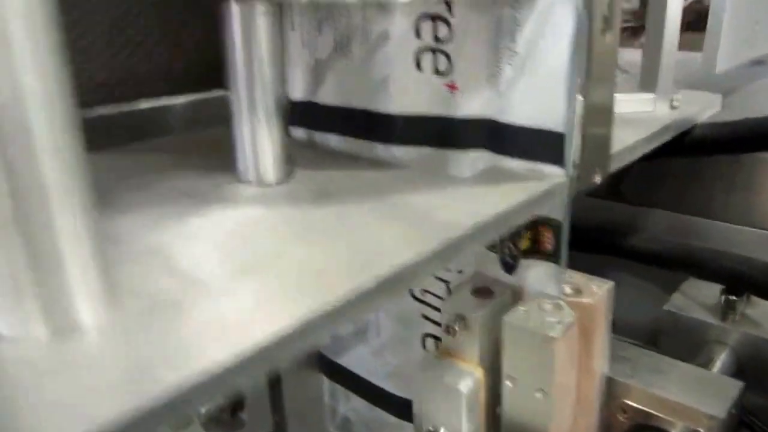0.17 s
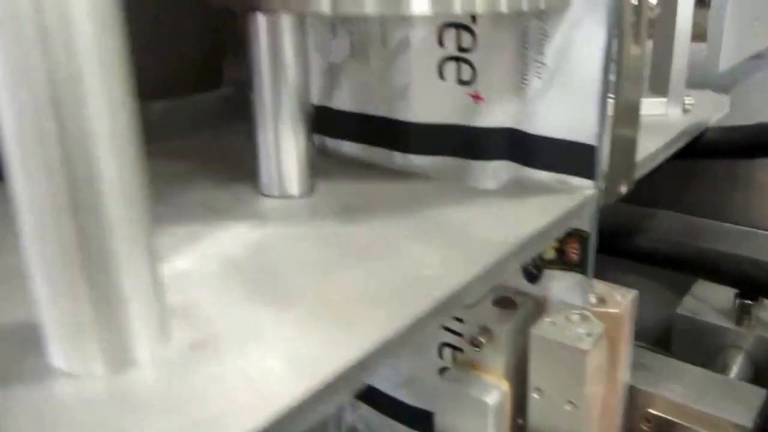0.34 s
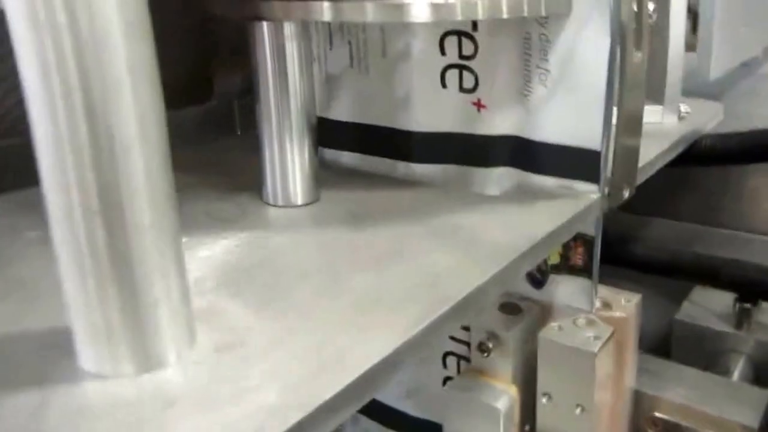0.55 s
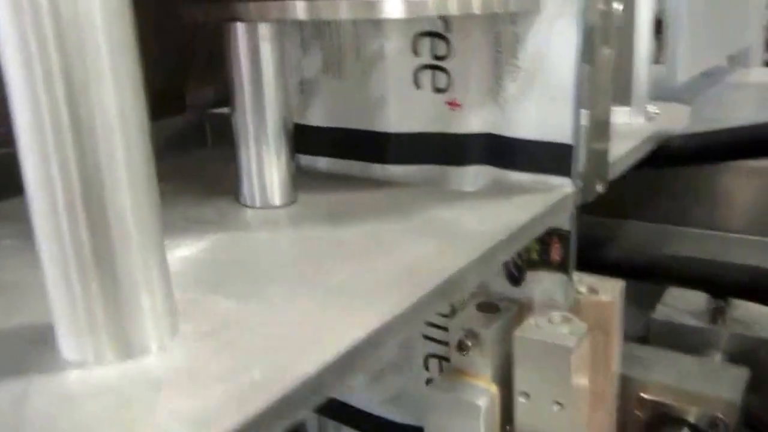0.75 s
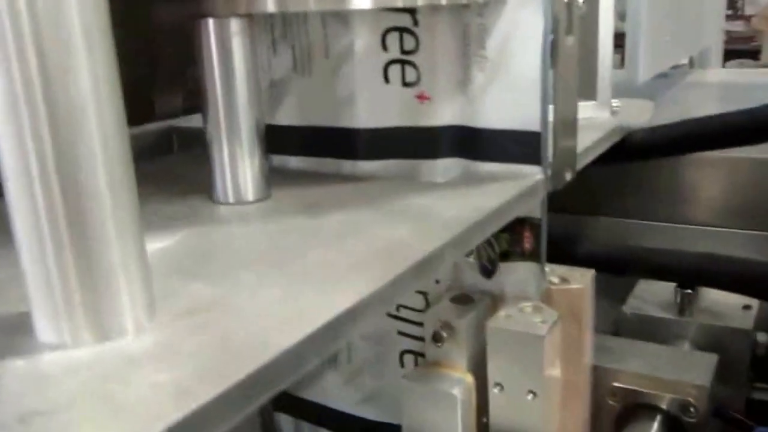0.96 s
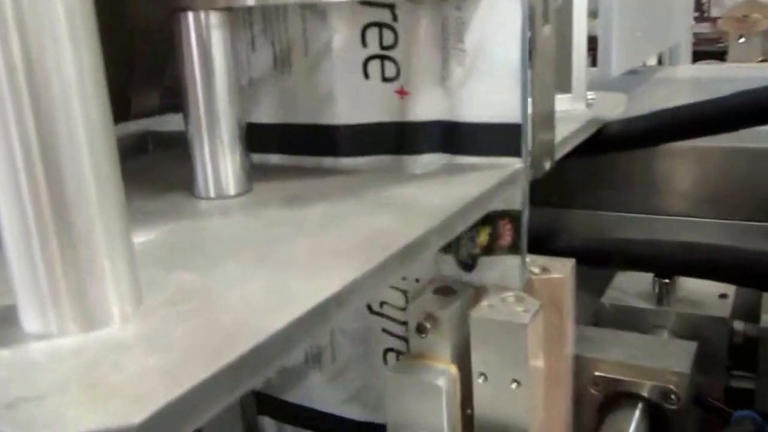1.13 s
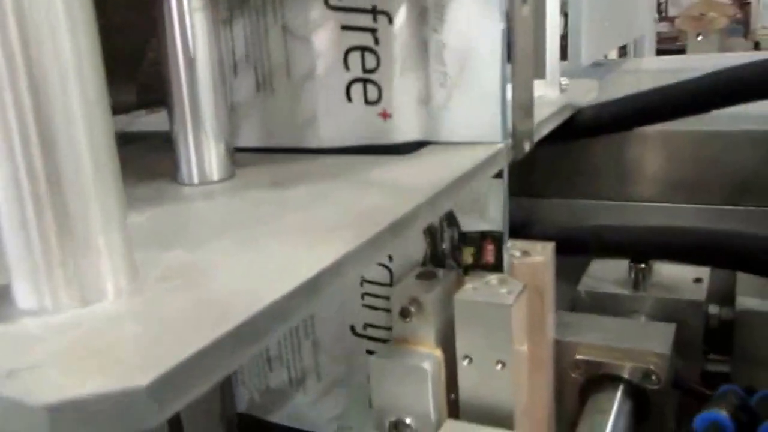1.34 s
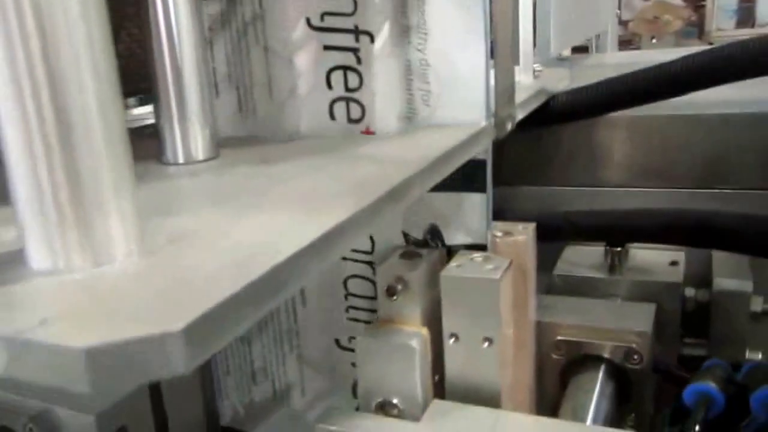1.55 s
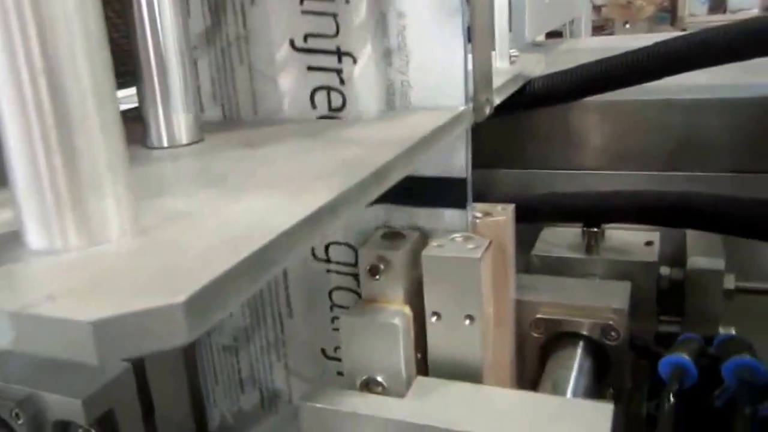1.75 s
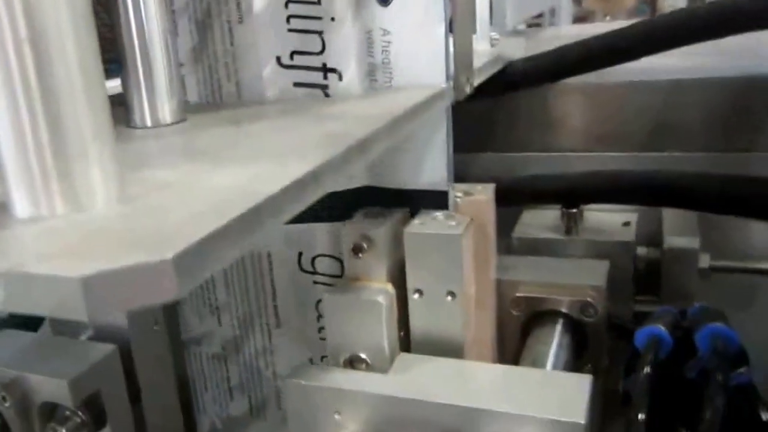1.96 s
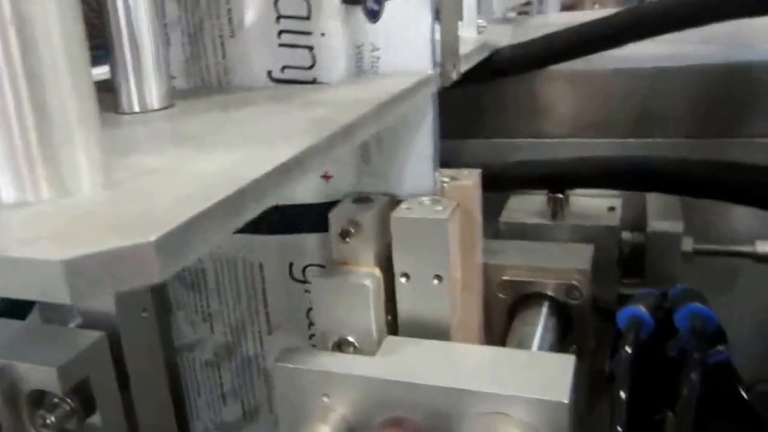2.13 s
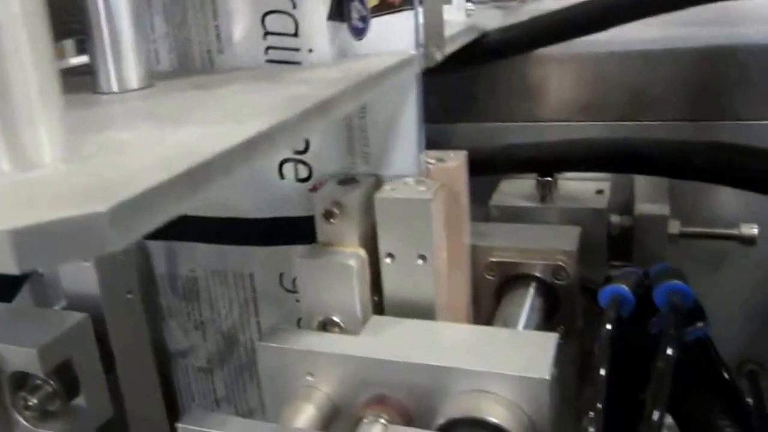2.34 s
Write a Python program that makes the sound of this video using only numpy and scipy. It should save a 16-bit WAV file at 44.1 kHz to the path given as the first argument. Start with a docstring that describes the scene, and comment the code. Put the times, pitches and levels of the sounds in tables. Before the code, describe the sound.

A packaging machine clacks, thuds and hisses through one cycle, then film ticks over rollers

```python
"""A bag-packing machine runs through one cycle in a factory hall, heard from close by.
Its steel jaws clack, knock and thud: each blow is a set of fading tones with a short noisy crack.
Coloured noise makes the hissing air valves, the moving carriage and the sliding film.
A thin snap, squeaks and ringing plates join in; light ticks and dull bumps follow as film is drawn.
A low, wavering motor hum, made of sine tones, lies under it all."""
import sys
import numpy as np
from scipy import signal
from scipy.fft import rfft, irfft
from scipy.io import wavfile

SR = 44100
rng = np.random.default_rng(int(sys.argv[2]) if len(sys.argv) > 2 else 0)


def unload_wav(signal):
    """Save mono or channel-first audio to the path in sys.argv[1] as 16-bit WAV at rate SR, clipped to [-1, 1]."""
    wavfile.write(
        sys.argv[1],
        SR,
        np.round(np.clip(np.atleast_2d(signal).T, -1, 1) * 32767).astype(np.int16),
    )


N = 105840
TIME = np.arange(N) / SR

# tones of a struck film roller: (frequency [Hz], level [dB], time to fade by 60 dB [s])
ROLLER = [(710, -13, 0.029), (892, -4, .04), (1140, 3, 0.035), (1420, -22, 0.023), (1570, -3.5, 0.029),
          (1720, -9, 0.026), (2328, -3, 0.022), (4410, -9.5, 0.019), (4790, -12.5, 0.021),
          (5360, -15, 0.016)]


def amp(db):
    """Turns decibels into a gain."""
    return 10 ** (np.asarray(db) / 20)


def balance(left_db, right_db):
    """Gives one gain to each of the two channels."""
    return amp([[left_db], [right_db]])


def unit(x):
    """Scales a sound to an average (rms) strength of 1."""
    return x / np.sqrt(np.mean(x ** 2) + 1e-20)


def read(points, hz):
    """Reads a table between its points, with frequency on a log scale."""
    f, value = np.transpose(points)
    return np.interp(np.log(hz + 1), np.log(f), value)


def add(mix, start_s, sound):
    """Mixes a sound in at its start time, cutting off what runs past the end."""
    part = mix[:, round(start_s * SR):][:, :sound.shape[-1]]
    part += sound[..., :part.shape[1]]


def tilt(hz, bright_db):
    """Gain that rises or falls by so many dB per octave."""
    return amp(bright_db * np.log2(np.maximum(hz, 20)))


def noise(tone, size, bright_db=0):
    """Noise coloured by the machine's panels: alike in both channels in the middle, unrelated in the treble."""
    # how alike left and right are: (frequency [Hz], likeness [0 to 1])
    likeness = [(30, 0.54), (70, 0.64), (140, .99), (500, 1), (1100, 0.91), (2200, 0.26), (4500, 0.16),
                (9000, 0.062)]
    # resonances of the machine's panels: (frequency [Hz], width [Hz], boost [dB])
    resonances = [(117.5, 7.4, 1), (239, 13, 2.5), (324, 18, 4), (526.6, 23, 5), (594, 8.1, 4.5),
                  (675, 10, 5.5), (795, 23, 4), (941, 24, 5.5), (994, 51, -6.5), (1165, 130, 3),
                  (1490, 70, 2), (1740, 27, 2), (2334, 78, 3), (2740, 47, -2), (3635, 60, 4.5)]
    hz = np.fft.rfftfreq(size, 1 / SR)
    left, other = rfft(rng.standard_normal((2, size)))
    shared = np.clip(read(likeness, hz), -1, 1)
    right = shared * left + np.sqrt(1 - shared ** 2) * other
    panels_db = sum(db / (1 + (2 * (hz - centre) / width) ** 2) for centre, width, db in resonances)
    gain = amp(read(tone, hz) + panels_db) * tilt(hz, bright_db)
    return unit(irfft(np.array([left, right]) * gain, size))


def wander(rate_hz):
    """Slow random motion of rms 1; a higher rate moves faster."""
    hz = np.fft.rfftfreq(N, 1 / SR)
    smoothing = np.exp(-(hz / rate_hz) ** 2) * (hz > 0)
    return unit(irfft(rfft(rng.standard_normal(N)) * smoothing, N))


def fade(t, t60):
    """Dies away smoothly, losing 60 dB in t60 seconds."""
    return np.exp(-np.log(1000) * t / t60)


def blows(events, modes, tone, rise_s, crack_db, crack_t60, tail_db, tail_t60):
    """Each blow makes a part ring at its own tones, with a short noisy crack and a longer noisy tail."""
    ring_s = .5
    out = np.zeros((2, N))
    t = np.arange(0, ring_s, 1 / SR)
    for start_s, db, bright_db in events:
        ring = sum(amp(mode_db) * tilt(hz, bright_db) * fade(t, t60) * np.sin(2 * np.pi * hz * t)
                   for hz, mode_db, t60 in modes)
        crack = unit(noise(tone, len(t), bright_db) * fade(t, crack_t60))
        tail = unit(noise(tone, len(t), bright_db) * fade(t, tail_t60))
        blow = unit(ring) + amp(crack_db) * crack + amp(tail_db) * tail
        blow = blow * (1 - np.exp(-t / rise_s))
        # the level sets the energy of the blow as if packed into 10 ms
        add(out, start_s, amp(db) * unit(blow) * np.sqrt(.01 / ring_s))
    return out


def sliding(curve, tone, rough_db, rough_hz):
    """Uneven friction: coloured noise that follows a level curve and wavers at random."""
    level_db = np.interp(TIME, *np.transpose(curve))
    return noise(tone, N) * amp(level_db + rough_db * wander(rough_hz))


def motor_hum():
    """Motor hum: a few low tones, each wavering in pitch and strength."""
    # tones of the hum: (frequency [Hz], level [dB])
    tones = [(108, -45), (167, -42), (246, -50), (527, -54), (587, -51.5)]
    waver_hz = 3.52
    hum = 0
    for hz, db in tones:
        phase = 2 * np.pi * np.cumsum(hz + waver_hz * wander(11.4)) / SR
        hum = hum + amp(db) * unit(np.sin(phase)) * amp(1.1 * wander(6.2))
    return hum


def factory_noise():
    """Dull noise of the factory hall that drifts gently in level."""
    # colour of the hall noise: (frequency [Hz], level [dB])
    colour = [(25, -13), (60, -11.5), (110, -9.5), (170, 1.5), (250, -1.5), (350, -11), (520, -7),
              (800, -16), (1500, -21), (2500, -33.5), (4000, -44), (9000, -62)]
    return amp(-37) * noise(colour, N) * amp(1.1 * wander(19))


def jaw_carriage():
    """The moving jaw carriage rumbles as uneven friction noise."""
    # loudness of the carriage: (time [s], level [dB])
    loudness = [(0, -36), (.19, -40.5), (.25, -30), (.31, -26.5), (.37, -25), (.43, -23.5), (.5, -32.5),
                (.55, -36), (.62, -32), (.69, -34.5), (.8, -24.5), (.88, -36), (.97, -41.5), (1.2, -40.5),
                (1.28, -24), (1.36, -33.5), (1.46, -45), (2.4, -59)]
    # colour of the carriage noise: (frequency [Hz], level [dB])
    colour = [(40, -2), (120, -5), (220, 0), (450, 0), (750, -3), (1000, -8.5), (1300, -11), (2300, -21),
              (3500, -36), (7000, -45.5), (15000, -37.5)]
    return sliding(loudness, colour, rough_db=1.7, rough_hz=70)


def drive_train():
    """The drive train adds a deep, slowly wavering rumble."""
    # loudness of the rumble: (time [s], level [dB])
    loudness = [(0, -40.5), (.18, -44), (.21, -27), (.235, -41), (.258, -18.5), (.29, -47), (.6, -39),
                (.68, -27.5), (.74, -34), (.9, -47.5), (1.8, -44), (2.4, -43.5)]
    # colour of the rumble: (frequency [Hz], level [dB])
    colour = [(20, -17), (40, 0), (62, -4), (100, -2), (140, -9.5), (300, -28), (1000, -70)]
    return sliding(loudness, colour, rough_db=-2.5, rough_hz=12)


def film_drive():
    """The film drive grows louder as it runs up, as low, uneven noise."""
    # loudness of the drive: (time [s], level [dB])
    loudness = [(0, -57), (1.2, -57), (1.45, -38.5), (1.8, -37), (2.05, -35), (2.25, -31.5), (2.4, -30)]
    # colour of the drive noise: (frequency [Hz], level [dB])
    colour = [(40, -6.5), (105, 6), (200, -2.5), (350, -3), (560, -1.5), (850, -4), (1000, -3.5),
              (1170, -9.5), (1600, -14.5), (3000, -30.5), (8000, -33)]
    return sliding(loudness, colour, rough_db=1.0, rough_hz=60)


def hiss():
    """Sliding film and leaking air hiss as bright, slightly uneven noise."""
    # loudness of the hiss: (time [s], level [dB])
    loudness = [(0, -59), (.18, -55), (.3, -53), (.5, -46.5), (.62, -57), (.7, -48), (.85, -57),
                (.93, -65.5), (1.19, -58), (1.23, -40), (1.36, -47), (1.8, -45.5), (2.4, -44.5)]
    # colour of the hiss: (frequency [Hz], level [dB])
    colour = [(800, 1), (2000, 4), (3000, 0), (4500, 3.5), (6000, -0.5), (9000, -4.5), (12000, -2),
              (15000, -7)]
    return sliding(loudness, colour, rough_db=0.45, rough_hz=150)


def air_valves():
    """Each air valve opens quickly, sags as the pressure falls, and shuts."""
    # puffs of air: (start [s], length [s], level [dB], sag [dB per s])
    vents = [(0.186, 0.015, -41.5, 10), (0.203, 0.11, -31, 136), (0.706, 0.06, -35, 15),
             (0.773, 0.059, -38, 137), (1.25, 0.013, -34, 10)]
    # colour of the escaping air: (frequency [Hz], level [dB])
    colour = [(300, -2), (1200, 5), (2500, 0), (4500, 0), (6500, -3), (10000, -3), (12500, 2), (14500, 3),
              (16000, -7)]
    rise_s, release_s = 0.0044, 0.011
    power = 0
    for start_s, length_s, db, sag_db in vents:
        t = np.maximum(TIME - start_s, 0)
        opening = np.minimum(t / rise_s, 1)
        closing = np.exp(-np.maximum(t - length_s, 0) / release_s)
        power = power + (amp(db - sag_db * t) * opening * closing) ** 2
    air = np.sqrt(power) * noise(colour, N) * amp(1.3 * wander(120))
    return air * balance(0.6, 0)


def frame_knocks():
    """The jaws knock and shake the frame, which rings low and fairly long."""
    # knocks: (time [s], level [dB], brightness [dB per octave])
    knocks = [(.1895, -25, -1), (.203, -23, 1.5), (.2445, -18, 0.5), (.277, -12.5, -0.5),
              (.292, -14.5, -0.5), (.4375, -11, -0.5), (.447, -12, -0.5), (.4615, -19, 0.5),
              (.470, -17, 0.5), (.499, -15.5, 0.5), (.520, -22, 2.5), (.546, -24, 0.5), (.568, -19, -2),
              (.7095, -21, -2), (.781, -28.5, 1), (.797, -21.5, 1.5), (.817, -23, 5), (.843, -25, 2),
              (1.259, -17.5, 2), (1.277, -22.5, -1), (1.292, -32, 7)]
    # tones of the frame: (frequency [Hz], level [dB], time to fade by 60 dB [s])
    modes = [(215.5, -4.5, .14), (245, 0, 0.19), (333, -9, .08), (380, -1, 0.053), (449.4, -2.5, .08),
             (518.4, -5.5, 0.14), (678.7, -2.5, 0.12), (801, -9, 0.11), (880, -16, 0.051),
             (1089, -6.5, 0.08)]
    # colour of the knock noise: (frequency [Hz], level [dB])
    colour = [(60, -16), (200, 4), (700, -3), (1300, -12.5), (2400, -20.5), (4000, -34), (15000, -51.5)]
    return blows(knocks, modes, colour, rise_s=0.0015,
                 crack_db=-1.5, crack_t60=0.066, tail_db=-8.5, tail_t60=0.49)


def jaw_clacks():
    """The steel jaws clack: hard blows with a fast start and short metal tones."""
    # clacks: (time [s], level [dB], brightness [dB per octave])
    clacks = [(.2622, -27, -3.5), (.2720, -11, -1.5), (.7205, -36.5, 12), (1.2425, -29.5, 2),
              (1.2580, -25, 3.5), (1.264, -29, 3), (1.277, -23, -3), (1.284, -28, -0.5)]
    # tones of the jaws: (frequency [Hz], level [dB], time to fade by 60 dB [s])
    modes = [(1230, -5.5, 0.019), (1250, 2.5, 0.039), (1420, -5, 0.029), (1538, -9.5, 0.04),
             (1886, -17, 0.064), (2190, -14, 0.03), (2753, -12.5, 0.038), (3490, -12.5, 0.025),
             (4210, -18, 0.042), (5570, -9, 0.012)]
    # colour of the clack noise: (frequency [Hz], level [dB])
    colour = [(150, -19), (700, -5.5), (1300, 5), (2300, -7), (4000, -10), (6000, -15.5), (10000, -21),
              (15000, -26.5)]
    return blows(clacks, modes, colour, rise_s=0.00065,
                 crack_db=-2, crack_t60=0.024, tail_db=-11, tail_t60=0.16)


def jaw_thuds():
    """The jaws thud against their stops: deep blows with a soft start and little noise."""
    # thuds: (time [s], level [dB], brightness [dB per octave])
    thuds = [(.7635, -10.5, -6.5), (.7795, -11, -9), (.8185, -5, 0.5), (.8275, -17.5, -1.5)]
    # tones of the machine body: (frequency [Hz], level [dB], time to fade by 60 dB [s])
    modes = [(71, -21, 0.086), (126, -7, 0.079), (183.3, 4.5, 0.034), (208.2, 3.5, 0.058),
             (242.8, 1.5, 0.079), (334, -8, 0.034)]
    # colour of the thud noise: (frequency [Hz], level [dB])
    colour = [(40, -28), (120, 3.5), (300, -1), (600, -14), (1500, -35), (5000, -65)]
    return blows(thuds, modes, colour, rise_s=0.0064,
                 crack_db=-17, crack_t60=0.046, tail_db=-22, tail_t60=0.78)


def from_right(pair):
    """Sound from the right reaches the left microphone a moment later."""
    lag_s = .00006
    delay = np.exp(-2j * np.pi * np.fft.rfftfreq(N, 1 / SR) * lag_s)
    return np.array([irfft(rfft(pair[0]) * delay, N), pair[1]])


def guide_squeaks():
    """The jaw guides squeak as the jaws slide: a thin, unsteady tone swells and fades."""
    # squeaks: (start [s], length [s], level [dB])
    squeaks = [(0.78, 0.014, -36), (0.797, 0.082, -51), (1.266, 0.037, -39)]
    pitch_hz, waver_hz = 4260, 110
    level = sum(amp(db) * np.sin(np.pi * np.clip((TIME - start_s) / length_s, 0, 1))
                for start_s, length_s, db in squeaks)
    return level * np.sin(2 * np.pi * np.cumsum(pitch_hz + waver_hz * wander(200)) / SR)


def snap():
    """A dry, high snap to the right, perhaps the blade: short tones and a sharp crack."""
    # the snap: (time [s], level [dB], brightness [dB per octave])
    snaps = [(.9155, -28.5, -5.5)]
    # tones of the blade: (frequency [Hz], level [dB], time to fade by 60 dB [s])
    modes = [(4890, -4, 0.019), (5430, -4, .008), (6470, -1.5, 0.016), (11230, 2, .011),
             (12030, -1.5, 0.019)]
    # colour of the snap noise: (frequency [Hz], level [dB])
    colour = [(1000, -23), (3500, -11), (5500, -1), (8000, 1), (12000, -10), (15000, -3)]
    sound = blows(snaps, modes, colour, rise_s=.0012,
                  crack_db=0, crack_t60=0.013, tail_db=-34, tail_t60=.04)
    return sound * balance(-7, 0)


def ringing_plates():
    """Steel plates ring on after the jaws open, as slowly fading tones."""
    # tones of the plates: (frequency [Hz], level [dB], time to fade by 60 dB [s])
    modes = [(323, -35, 0.37), (528, -28.5, 1.35), (588, -29, 1.2), (709, -31, 0.74), (844, -50, 0.35),
             (1151, -30, 0.55)]
    start_s = 1.277
    out = np.zeros((2, N))
    ring = sum(amp(db) * fade(TIME, t60) * np.sin(2 * np.pi * (hz * TIME + rng.random()))
               for hz, db, t60 in modes)
    add(out, start_s, ring)
    return out


def film_ticks():
    """The film ticks lightly over the rollers as it is pulled."""
    # ticks: (time [s], level [dB], brightness [dB per octave])
    ticks = [(1.4315, -33, 0), (1.6175, -29, 0.5), (1.7215, -29, 0), (1.8078, -29.5, 0.5), (1.910, -29, 1),
             (2.0073, -29.5, 0.5), (2.0847, -34.5, 4), (2.1874, -32.5, 3), (2.2653, -34.5, 3.5),
             (2.315, -45, -2), (2.3705, -29, 2)]
    # colour of the tick noise: (frequency [Hz], level [dB])
    colour = [(400, 5.5), (1200, 3.5), (2400, 0.5), (3000, -14), (4700, -3.5), (6500, -14), (10000, -17),
              (15000, -18)]
    return blows(ticks, ROLLER, colour, rise_s=0.00037,
                 crack_db=-1.5, crack_t60=0.025, tail_db=-9.5, tail_t60=0.17)


def roller_bumps():
    """Now and then a roller bumps dully, with a softer start than a tick."""
    # bumps: (time [s], level [dB], brightness [dB per octave])
    bumps = [(1.6905, -27, -3.5), (2.0265, -27.5, -3)]
    # colour of the bump noise: (frequency [Hz], level [dB])
    colour = [(200, -8.5), (600, -1), (1200, -1), (2400, -2.5), (3200, -13), (6000, -19), (15000, -30)]
    return blows(bumps, ROLLER, colour, rise_s=0.0027,
                 crack_db=2, crack_t60=0.034, tail_db=-8, tail_t60=0.15)


def scene():
    """The whole machine in its hall, louder on the right."""
    background = motor_hum() + factory_noise()
    carriage = jaw_carriage() + drive_train()
    film = (film_drive() + hiss() + film_ticks() + roller_bumps()) * balance(0.04, -0.74)
    jaws = from_right(frame_knocks() + jaw_clacks() + jaw_thuds())
    details = guide_squeaks() + snap() + ringing_plates()
    return (background + carriage + film + air_valves() + jaws + details) * balance(-4, 2)


def record(dry):
    """The microphone colours the sound, peaks are rounded off softly, and the highest treble is cut."""
    # response of the microphone, with a treble notch: (frequency [Hz], level [dB])
    response = [(15, -16), (45, -1), (6000, -1), (7000, -6), (7500, -16), (8050, -17), (8700, -5.5),
                (10000, 0), (16000, -0.5)]
    ceiling, knee = .93, .7  # full scale is 1; rounding starts at the knee
    edge_hz = 15600
    hz = np.fft.rfftfreq(2 * N, 1 / SR)
    coloured = irfft(rfft(dry, 2 * N) * amp(read(response, hz)))[:, :N]
    below = np.clip(coloured, -knee, knee)
    rounded = below + (ceiling - knee) * np.tanh((coloured - below) / (ceiling - knee))
    low_pass = signal.firwin(401, edge_hz, window=("kaiser", 9), fs=SR)
    return signal.oaconvolve(rounded, low_pass[None], "same")


dry = scene()
out = record(dry)
unload_wav(out)
```